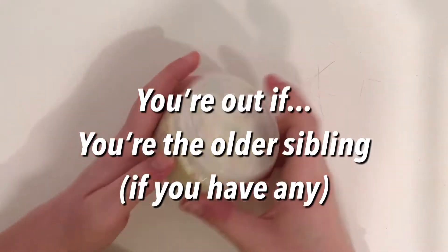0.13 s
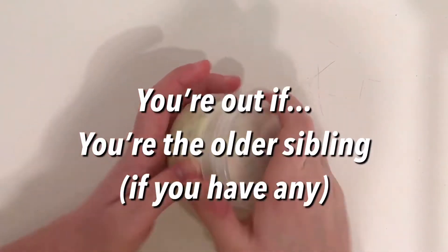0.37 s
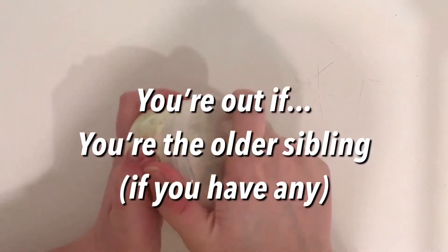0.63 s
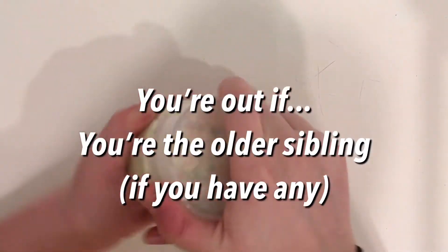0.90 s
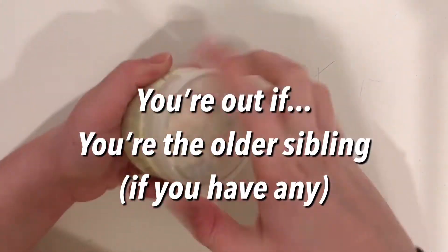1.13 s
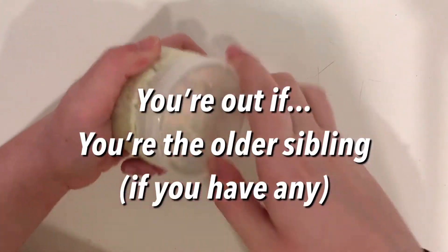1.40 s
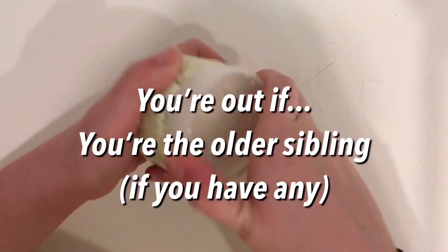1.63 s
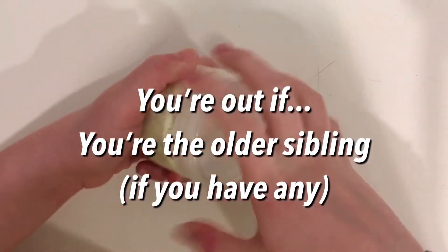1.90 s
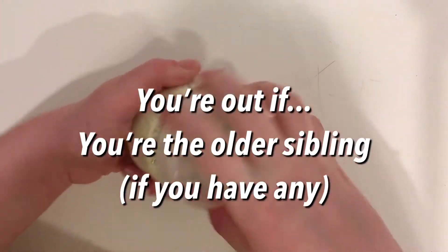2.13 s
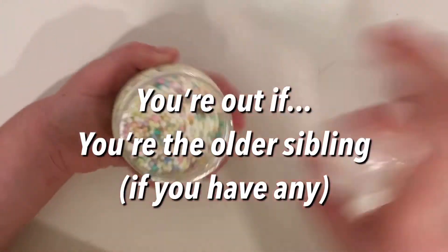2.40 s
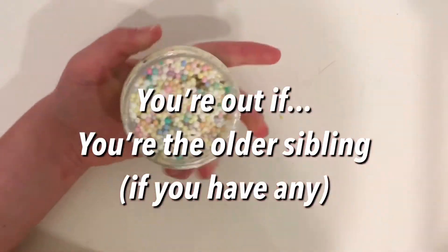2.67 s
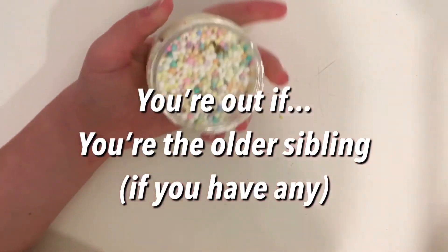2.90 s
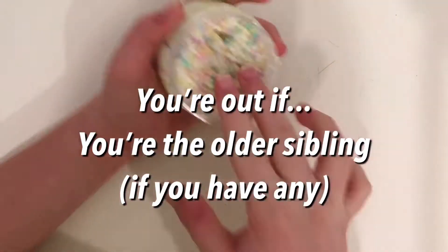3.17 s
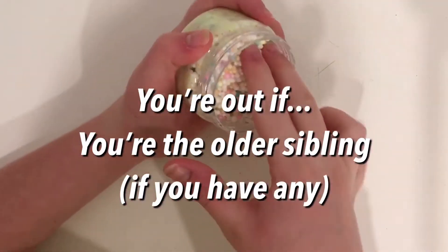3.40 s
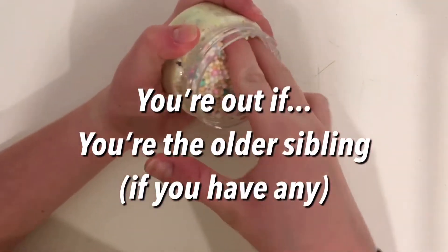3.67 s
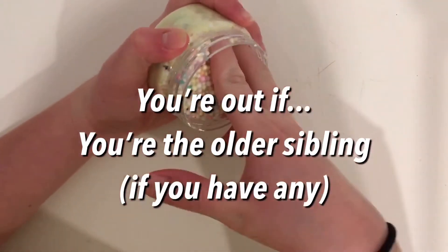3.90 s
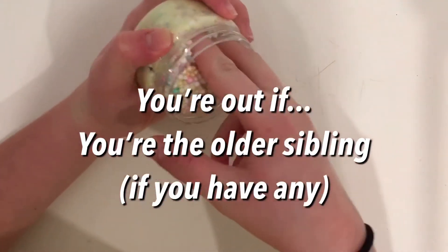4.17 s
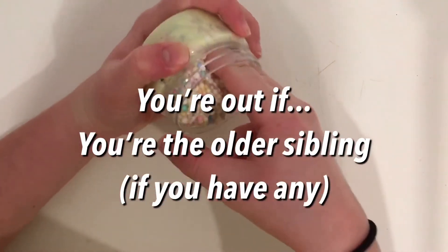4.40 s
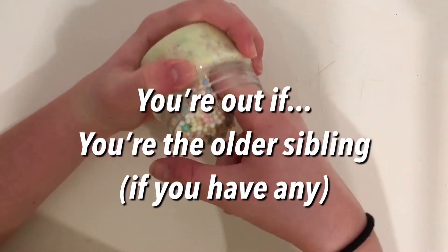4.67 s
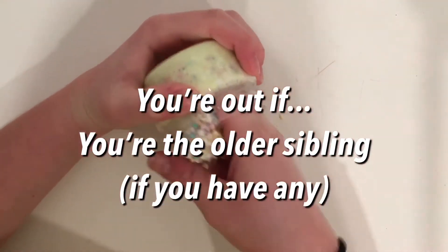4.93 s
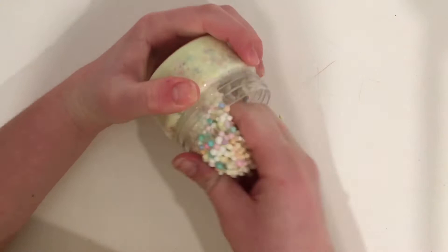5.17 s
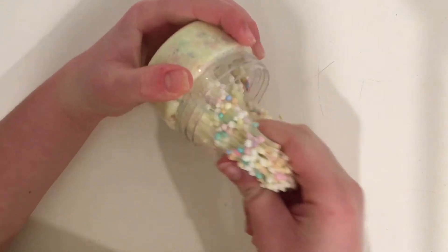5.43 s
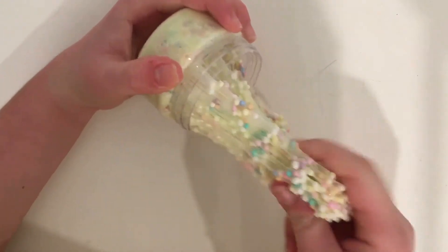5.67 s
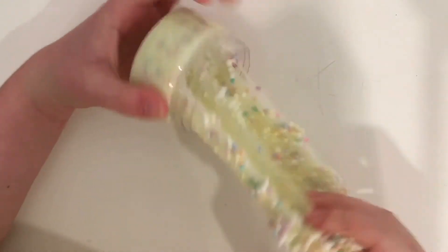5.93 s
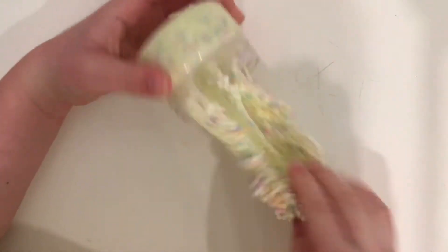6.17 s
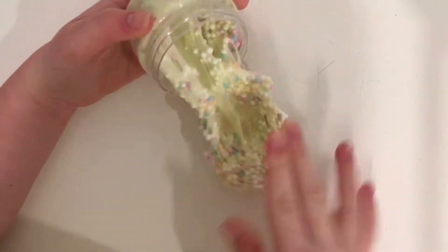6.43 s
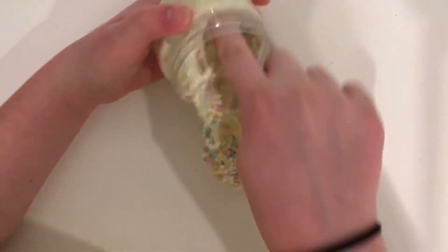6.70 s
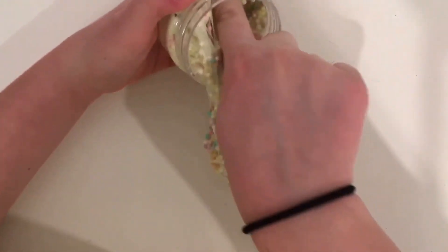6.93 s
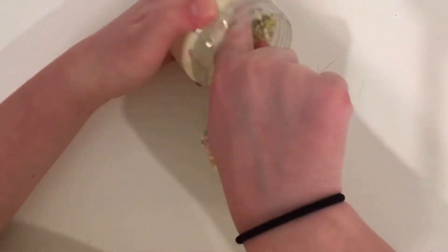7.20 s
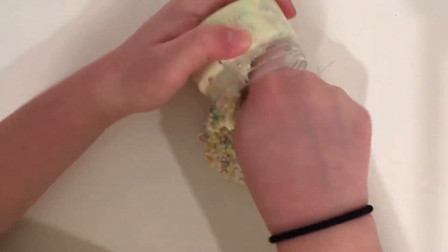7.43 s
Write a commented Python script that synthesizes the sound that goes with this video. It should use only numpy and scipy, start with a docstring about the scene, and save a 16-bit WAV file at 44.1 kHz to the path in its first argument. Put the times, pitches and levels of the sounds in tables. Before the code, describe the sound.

A close microphone in a quiet room with soft low rumble and faint hiss. From 0 to 2.5 seconds hands grip and twist a small plastic jar: gentle skin rustle, a very faint dry creak around 0.4 to 0.6, a brushing slip at 0.65, then hollow rubs and knocks near 1.2, 1.6 and 1.9, and a sharp loud click at 2.07. At 2.6 the lid hits a hard table with a bright plastic clack, bounces at 2.73 and wobbles in quickening rattles until about 3.1, the table top ringing briefly. Fingers enter bead-filled slime from 3.0: crisp crackle and sharp pops, a soft bump near 4.0, then dense snapping and wet squelching from 4.2 to 5.6, with a strong pop at 5.56. Stretching thins to sparse ticks and smoother rustle after 5.9, nearly quiet around 6.4, with snaps at 6.65 and renewed crackle and squelch from 7.15 to the end.

```python
"""Hands grip a small plastic jar and unscrew its lid: skin noise, hollow knocks and a creak of stick-slip clicks.
The lid drops on a hard table and wobbles to rest: rough contacts set its modes and the table top ringing.
Fingers then dig bead-filled slime out of the jar and stretch it: grains of noise crackle and squelch,
short bursts are popping air pockets, and arms and jar move the table top.
Filtered noise makes a quiet room throughout; the microphone is close."""
import sys
import numpy as np
from scipy import signal
from scipy.fft import rfft, irfft, next_fast_len
from scipy.io import wavfile

SR = 44100
rng = np.random.default_rng(int(sys.argv[2]) if len(sys.argv) > 2 else 0)


def inscribe(sig):
    """Save sig as 16-bit PCM at rate SR to the path in sys.argv[1].

    A 1-D sig is mono; a 2-D sig holds one channel per row.
    Samples are clipped to [-1, 1] before scaling.
    """
    pcm = np.round(np.clip(np.atleast_2d(sig).T, -1, 1) * 32767)
    wavfile.write(sys.argv[1], SR, pcm.astype(np.int16))


def magnitude_from_level(level_db):
    """Linear magnitude for a level in decibels (20 dB per decade)."""
    exponent = np.asarray(level_db, float) / 20
    return 10 ** exponent


N = 333837

# fingers in the slime: t/s, rustle level/dB, wet squelch level/dB, share of crackle in the rustle (0-1)
HANDS = [(3.0, -70, -59, .9), (3.09, -61, -64, 1), (3.3, -49.5, -78, 0.93), (3.52, -55, -85, 0.6),
         (3.7, -57, -75, 0.74), (3.78, -69.5, -77, 0.63), (3.9, -61.5, -74.5, 0.85), (3.96, -52, -68, 0.86),
         (4.1, -59, -66, 1), (4.28, -53, -63.5, 0.65), (4.45, -56.5, -68, 0.65), (4.63, -61.5, -68, 1),
         (4.8, -62, -68, .9), (4.87, -51.5, -62.5, 0.83), (5.2, -53, -64.5, 0.97), (5.42, -55, -61, 0.85),
         (5.7, -58, -75, 0.3), (5.82, -54, -82, 0.45), (5.98, -71.5, -87, 1), (6.08, -53.5, -81, 0.52),
         (6.2, -65, -81, 0.76), (6.28, -68, -76.5, 0.54), (6.5, -63.5, -76.5, 0.16), (6.85, -69.5, -75, 1),
         (7.1, -65.5, -76.5, .9), (7.18, -51, -64, 0.57), (7.3, -61, -67.5, 0.83), (7.57, -52, -58, 1)]
# pitch of the air space in the jar as fingers fill and leave it: t/s, f/Hz
AIR_SPACE = [(3.0, 1300), (4.8, 1290), (4.87, 673), (5.05, 920), (5.25, 1260), (5.6, 1400), (6.5, 1300),
             (7.57, 1250)]
TABLE_HZ, TABLE_T60_S = 96, 0.28   # lowest mode of the table top


def rms_one(x):
    """Scale to rms 1."""
    return x / np.sqrt(np.mean(x ** 2) + 1e-20)


def peak_one(x):
    """Scale every row to peak 1."""
    return x / np.abs(x).max(axis=-1, keepdims=True)


def in_time(rows):
    """Columns of a curve, one value a sample."""
    s, *columns = np.transpose(rows)
    return [np.interp(np.arange(N) / SR, s, column) for column in columns]


def during(rows):
    """True while a curve lasts."""
    t = np.arange(N) / SR
    return (t > rows[0][0]) & (t < rows[-1][0])


def band(x, low_hz, high_hz):
    """Butterworth band-pass: keeps the sound between two pitches."""
    edges = [low_hz, min(high_hz, SR / 2.2)]
    return signal.sosfilt(signal.butter(2, edges, "band", fs=SR, output="sos"), x)


def coloured(x, spectrum):
    """Shape by a spectrum in dB per Hz, then scale to rms 1."""
    hz, db = np.transpose(spectrum)
    size = next_fast_len(len(x))
    grid = np.maximum(np.arange(size // 2 + 1) * SR / size, 1)
    gain = magnitude_from_level(np.interp(np.log(grid), np.log(hz), db))
    return rms_one(irfft(rfft(x, size) * gain, size)[:len(x)])


def resonance(x, hz, width_hz):
    """Two-pole band with gain 1 on top."""
    r = np.exp(-np.pi * width_hz / SR)
    feedback = [1, -2 * r * np.cos(2 * np.pi * hz / SR), r * r]
    return signal.lfilter(np.array([1, 0, -1]) * (1 - r * r) / 2, feedback, x)


def ring(clicks, hz, t60):
    """A unit click sets a sine of starting height 1 ringing; it falls 60 dB in t60 seconds."""
    r, w = magnitude_from_level(-60 / (t60 * SR)), 2 * np.pi * hz / SR
    return signal.lfilter([0, np.sin(w)], [1, -2 * r * np.cos(w), r * r], clicks + 1e-18)


def drift(rate):
    """Slow random wandering of rms 1; a higher rate wanders faster."""
    r = np.exp(-2 * np.pi * rate / SR)
    noise = rng.standard_normal(N + SR)
    return rms_one(signal.lfilter([1], [1, -2 * r, r * r], noise)[SR:])   # first second: settling


def grains(per_s, spread_db):
    """Random clicks of very uneven size."""
    sizes = magnitude_from_level(spread_db * np.minimum(rng.exponential(1, N), 5)) * rng.choice([-1, 1], N)
    return sizes * (rng.random(N) < per_s / SR)


def bursts(count, rise_ms, t60_ms, size=2048):
    """Rows of noise that swell and die."""
    ms = np.arange(size) / SR * 1000
    rise_ms = np.maximum(rise_ms, .05)
    rise = np.minimum(ms / rise_ms, 1) ** 2
    fall = magnitude_from_level(-60 * np.maximum(ms - rise_ms, 0) / np.maximum(t60_ms, 1))
    return rng.standard_normal((count, size)) * rise * fall


def mixed(parts, gains):
    """Sum of bands, with a peak height set by their gains alone."""
    total = sum(gain * peak_one(part) for part, gain in zip(parts, gains))
    return peak_one(total) * np.sqrt(sum(gain ** 2 for gain in gains))


def add(out, s, sounds):
    """Lay each row into out at its time."""
    for at, sound in zip(np.round(np.asarray(s) * SR).astype(int), sounds):
        out[at:at + len(sound)] += sound[:N - at]


def swells(start_s, stop_s, db, rise_db_per_s, fall_db_per_s):
    """Level in dB of overlapping swells that rise, hold and fade."""
    t = np.arange(0, N + 64, 64) / SR   # one value every 64 samples, joined by lines
    before, after = np.maximum(start_s - t, 0), np.maximum(t - stop_s, 0)
    each = db - rise_db_per_s * before - fall_db_per_s * after
    total_db = 10 * np.log10(np.sum(magnitude_from_level(2 * each), axis=0) + 1e-14)   # powers add up
    return np.interp(np.arange(N) / SR, t, total_db)


def echoes(x, t60, cut_hz):
    """Dense reflections as fading noise; above cut_hz the noise is weaker and fades more slowly."""
    t = np.arange(SR // 2) / SR
    noise = rng.standard_normal(len(t)) * np.minimum(t / 0.0013, 1)
    dull = signal.sosfilt(signal.butter(1, cut_hz, fs=SR, output="sos"), noise)
    tail = dull * magnitude_from_level(-60 * t / t60) + 0.35 * (noise - dull) * magnitude_from_level(-60 * t / (1.4 * t60))
    return signal.fftconvolve(x, tail / np.sqrt(np.sum(tail ** 2)))[:N]


def room_tone():
    """Steady rumble and hiss, with a wavering low hum: noise through narrow resonances."""
    # sound of the quiet room: f/Hz, level per Hz/dB
    room_spectrum = [(15, -30.5), (25, -3.5), (80, 0.5), (123, 1), (241, -13), (425, -14), (500, -23),
                     (691, -22.5), (881, -26), (1250, -25.5), (4950, -37), (6140, -30), (10300, -34),
                     (13100, -29.5), (15800, -28.5)]
    hum_hz, hum_width_hz = 46, 14
    hum = resonance(rng.standard_normal(N), hum_hz, hum_width_hz)
    hum = rms_one(resonance(hum, hum_hz, 2 * hum_width_hz))
    return magnitude_from_level(-59.5) * coloured(rng.standard_normal(N), room_spectrum) + magnitude_from_level(-65) * hum


def rustle(db, crackle):
    """Smooth hiss, and fine clicks in clumps; each click has a colour of its own."""
    # colour of skin and slime noise: f/Hz, level per Hz/dB
    rustle_spectrum = [(350, -32), (600, 1), (1040, -14.5), (2630, -3.5), (5000, -1), (6230, -4.5),
                       (7760, -7), (10300, 0), (12200, 2), (14400, 1), (15800, -4.5)]
    clicks = grains(1200 * magnitude_from_level(6 * drift(30)), spread_db=5.0)
    edges_hz = [700, 2500, 5000, 8000, 11000, 18000]
    dealt = rng.integers(0, 5, N)   # each click sounds in its own band and the neighbouring ones
    fine = sum(band(clicks * (abs(dealt - k) <= 1), edges_hz[k], edges_hz[k + 1]) for k in range(5))
    hiss = coloured(rng.standard_normal(N), rustle_spectrum) * magnitude_from_level(3.3 * drift(20))
    hiss_share = np.sqrt(1 - np.clip(crackle, 0, 1) ** 2)
    return magnitude_from_level(db) * (crackle * coloured(fine, rustle_spectrum) + hiss_share * hiss)


def jar(x):
    """The plastic jar and the air inside it colour whatever rubs or knocks it."""
    # resonances of the jar: f/Hz, width/Hz, level/dB
    jar_modes = [(290, 130, -8), (550, 190, 2), (780, 220, -7), (1150, 110, 0)]
    # neighbouring resonances have opposite signs
    return sum(magnitude_from_level(db) * (-1) ** k * resonance(x, hz, width) for k, (hz, width, db) in enumerate(jar_modes))


def hollow_rub(db):
    """Fingers slide on the jar wall in uneven jerks: flickering noise and clicks through the jar."""
    rubbing = rng.standard_normal(N) * magnitude_from_level(3 * drift(40))
    rubbing = rubbing + .6 * rms_one(grains(500, spread_db=4))
    return magnitude_from_level(db) * rms_one(band(jar(rubbing), 300, 1500))


def rumble(db):
    """Handling shakes jar and table top: uneven low noise."""
    return magnitude_from_level(db) * rms_one(band(rng.standard_normal(N) * magnitude_from_level(2.5 * drift(30)), 120, 380))


def grips():
    """Each grip swells and fades: skin rustles, the jar sounds hollow, the hands rumble."""
    # grips and turns of the closed jar: loudest t/s, skin rustle level/dB, hollow level/dB, swell/s, fade/s
    grip_rows = [(.06, -64, -84, 0.23, 0.17), (.33, -62, -74, 0.23, 0.4), (.48, -64.5, -69.5, 0.86, 0.51),
                 (0.656, -46.5, -80, 0.13, 0.16), (0.831, -51, -64.5, 0.35, 0.24),
                 (0.906, -59, -47.5, 0.11, 0.064), (1.163, -48, -41.5, 0.012, 0.034),
                 (1.2, -61.5, -62, 0.14, 0.18), (1.638, -46.5, -48.5, 0.2, 0.17),
                 (1.699, -68, -48.5, 0.25, 0.029), (1.891, -79, -50.5, 0.011, 0.25),
                 (1.962, -44.5, -42, 0.088, 0.2), (2.068, -37, -45, 0.013, 0.09),
                 (2.2, -64, -67.5, 0.6, 0.21), (2.41, -66.5, -78, 0.14, 0.15)]
    s, rustle_db, hollow_db, swell_s, fade_s = np.transpose(grip_rows)[:, :, None]
    swing_db = 30   # swell and fade are the times to rise and fall this much
    rise, fall = swing_db / np.maximum(swell_s, .005), swing_db / np.maximum(fade_s, .005)
    rustle_db = swells(s, s, rustle_db, rise, fall)
    hollow_db = swells(s, s, hollow_db, rise, fall)
    rumble_db = np.maximum(hollow_db - 1, -71.5)   # never quieter than the still hands
    before_slime = np.arange(N) / SR < HANDS[0][0]
    return rustle(rustle_db, crackle=0.45) + hollow_rub(hollow_db) + rumble(rumble_db) * before_slime


def touches():
    """Skin slips briefly on the plastic and knocks the hollow jar: noise bursts in three bands."""
    # slips and knocks of lid and fingers:
    # t/s, treble peak/dB, middle above treble/dB, knock above treble/dB, t60/ms
    touch_rows = [(0.645, -27.5, -9, -24, 60), (0.6993, -34.5, -20, -11, 3.1), (0.216, -68, 6, 9.5, 13),
                  (0.259, -62, 0.5, 6, 9), (0.752, -39.5, -18, -8, 14), (1.131, -43, -21, -8, 4.6),
                  (1.1617, -30.5, -3, -4.5, 16.3), (1.284, -43.5, -11, -12, 3.3), (1.293, -50, -3, -34, 5),
                  (1.425, -45.5, -5, -17, 6), (1.6177, -31, -10, -18, 7.1), (1.642, -26.5, -24, 0.5, 13.8),
                  (1.7078, -26.5, -10.5, -20, 7.1), (1.8797, -36, -15, 3, 8), (1.907, -53.5, -6, 16, 7.8),
                  (1.9549, -23, -30, -4.5, 16), (1.972, -28.5, -17, -25, 45), (2.0609, -46, -8, 10, 9),
                  (2.0709, -10.5, -14, -14, 7.5), (2.081, -24, -11, -35, 24), (2.581, -55.5, 5, -2, 8.5)]
    s, db, middle_db, knock_db, t60_ms = np.transpose(touch_rows)[:, :, None]
    burst = bursts(len(s), 0.079 * t60_ms, t60_ms)   # longer bursts rise more slowly
    knock = jar(burst) + .4 * band(burst, 130, 900)
    parts = band(burst, 6000, 17000), band(burst, 2000, 6000), knock
    out = np.zeros(N)
    add(out, s[:, 0], magnitude_from_level(db) * mixed(parts, [1, magnitude_from_level(middle_db), magnitude_from_level(knock_db)]))
    return out


def creak():
    """Nearly regular stick-slip steps of the turning thread ring the plastic."""
    # thread creaks while the lid turns: start t/s, length/s, slips per second/Hz, relative level/dB
    creak_rows = [(0.384, .01, 105, -40), (0.417, .06, 122, -40), (0.503, .04, 123, -37.5),
                  (0.582, .045, 160, -38)]
    # what the slips ring: f/Hz, width/Hz, level/dB
    thread_modes = [(1200, 120, 17), (2140, 240, 5.5), (4300, 520, 7), (6060, 830, 4)]
    start, length, per_s, db = np.transpose(creak_rows)[:, :, None]
    middle = start + length / 2
    rate = np.interp(np.arange(N) / SR, middle[:, 0], per_s[:, 0])
    cycles = np.cumsum(rate * magnitude_from_level(0.45 * drift(20))) / SR
    slips = np.diff(np.floor(cycles), prepend=0)   # one click each time a cycle is full
    level_db = swells(start, start + length, db, rise_db_per_s=600, fall_db_per_s=900)
    slips = slips * magnitude_from_level(level_db + 3.9 * drift(15) + rng.normal(0, 3.0, N))
    ringing = sum(magnitude_from_level(mode_db) * resonance(slips, hz, width) for hz, width, mode_db in thread_modes)
    return 1.5 * band(slips, 10000, 17000) + ringing


def rolling_rim():
    """The rim rolls on the table: dense small contacts."""
    # rolling of the lid's rim: t/s, relative level/dB
    wobble = [(2.72, -45), (2.772, -50), (2.832, -45.5), (2.918, -49), (3.054, -47), (3.16, -66)]
    return magnitude_from_level(in_time(wobble)[0] - 24) * during(wobble) * rms_one(grains(2500, spread_db=3.0))


def lid_ring(bounces, size=1024):
    """Each contact is a short rough push into all modes of the lid; the rolling rim drives them too."""
    # modes of the lid: f/Hz, relative level/dB, t60/s before the cap below
    lid_modes = [(960, -11, 0.037), (1067.6, -20, 0.21), (1222, -13, 0.089), (1270, -12, .015),
                 (1697, -4, 0.017), (2000, -15.5, .03), (2318, -6, 0.016), (2400, -2, .01),
                 (2800, 3, 0.0075), (3040, -5.5, 0.0063), (3530, 2.5, .01), (4000, 0, 0.012),
                 (5980, -4.5, 0.0083), (6290, 1, 0.013), (7050, -24, 0.0027), (8900, -2, 0.0042),
                 (12280, 2.5, 0.00091)]
    s, db, contact_ms, bright_db, favoured_hz, low_db = bounces
    t = np.arange(size) / SR
    rolling = rolling_rim()
    out = np.zeros(N)
    for hz, mode_db, t60 in lid_modes:
        # the push is slightly shorter for high modes
        rise = t / (np.maximum(contact_ms, .2) / 1000) * (hz / 2500) ** 0.11
        push = rng.standard_normal((len(s), size)) * rise * np.exp(-2 * rise)
        nearby = np.exp(-2j * np.pi * t[:, None] * (hz + np.linspace(-1, 1, 5) / t60))
        push /= np.sqrt(np.mean(np.abs(push @ nearby) ** 2, axis=1, keepdims=True))   # unit drive at this mode
        strength_db = db - 9 + mode_db + bright_db * np.log2(hz / 2500) + low_db * (hz < 1500)
        # each spot of the rim drives other modes
        strength_db += 7 * np.exp(-(np.log2(hz / favoured_hz) / 0.2) ** 2)
        pushes = rolling * magnitude_from_level(mode_db)
        add(pushes, s[:, 0], magnitude_from_level(strength_db + rng.normal(0, 0.65, db.shape)) * push)
        longest_s = 30 / hz + .1 * (hz < 2300)
        out += ring(pushes, hz, min(t60, longest_s))
    return band(out, 800, 18000)   # a small lid radiates no bass


def lid_crack(bounces):
    """Each bounce gives a broad crack and a bright top: two bands of noise bursts."""
    s, db, contact_ms, bright_db, _, _ = bounces
    crack = np.zeros(N)
    middle = peak_one(band(bursts(len(s), contact_ms / 2, t60_ms=8), 1200, 5400))
    add(crack, s[:, 0], magnitude_from_level(db - 10) * middle)
    top = peak_one(band(bursts(len(s), contact_ms / 3, t60_ms=4.0), 7000, 14000))
    add(crack, s[:, 0], magnitude_from_level(db - 14 + 1.8 * bright_db) * top)
    return crack


def table_knock(bounces):
    """Each bounce thumps the table top, whose low modes ring on."""
    # higher modes of the table top: f/Hz, level above the lowest mode/dB, t60/s
    table_modes = [(200, 3.5, 0.027), (394.7, -0.5, 0.071)]
    s, bounce_db = bounces[:2]
    thumps = np.zeros(N)
    add(thumps, s[:, 0], magnitude_from_level(bounce_db - 30.5) * np.hanning(60) / 30)
    knock = sum(magnitude_from_level(db) * ring(thumps, hz, t60) for hz, db, t60 in table_modes)
    return knock + ring(thumps, TABLE_HZ, TABLE_T60_S)


def table_tail(x):
    """The table top rings densely after each contact."""
    return echoes(x, t60=0.33, cut_hz=3300)


def lid():
    """The dropped lid bounces and rolls: ringing lid, cracks, and the table top under it."""
    # lid on table:
    # t/s, strength/dB, contact length/ms, brightness per octave/dB, favoured modes f/Hz, low ring/dB
    bounce_rows = [(2.6027, -6.5, 1.36, -0.5, 2450, 7.5), (2.7308, -5, 1.27, 4, 2280, -11),
                   (2.813, -17.5, 5.1, -2, 3240, -3.5), (2.884, -15.5, 3.7, 0.5, 1540, -2),
                   (2.943, -20.5, 3.6, -3.5, 1590, -7), (2.958, -28, 1.7, -7, 2620, -17),
                   (2.992, -28, 4.95, -2, 3180, 2), (3.0072, -23, 0.65, 2, 2800, -6),
                   (3.034, -25, 4.7, -4, 2000, -4), (3.0449, -25, 1.5, -1, 3130, -6)]
    bounces = np.transpose(bounce_rows)[:, :, None]
    ringing, crack = lid_ring(bounces), lid_crack(bounces)
    ringing = ringing + magnitude_from_level(-14.5) * table_tail(ringing)
    crack = crack + magnitude_from_level(-7) * table_tail(crack)
    return ringing + crack + table_knock(bounces)


def table_boom():
    """The table top hums at its lowest mode when arms lean on it: noise through a narrow resonance."""
    # arms lean on the table top: start t/s, length/s, level/dB
    leans = [(2.6, .06, -52), (2.736, 0.096, -49), (3.165, 0.058, -52), (4.006, 0.026, -50),
             (4.233, .2, -54.5), (4.5, 0.16, -55.5), (4.9, 0.24, -68), (5.885, 0.062, -58),
             (6.098, .25, -58.5), (6.58, .1, -63.5), (7.16, 0.36, -64.5)]
    start, length, db = np.transpose(leans)[:, :, None]
    lean_db = swells(start, start + length, db, rise_db_per_s=250, fall_db_per_s=157)
    boom = resonance(rng.standard_normal(N), TABLE_HZ, width_hz=25)
    return magnitude_from_level(lean_db) * rms_one(resonance(boom, TABLE_HZ, width_hz=50))


def squelch(db, width, size=256):
    """Wet slime sliding in the open jar: clumps of dull grains, coloured by the air space as its pitch moves."""
    wet = rms_one(grains(350 * magnitude_from_level(6.7 * drift(19)), spread_db=5.0)) + 1.12 * rng.standard_normal(N)
    out, state = np.zeros(N), np.zeros(2)
    for i, hz in zip(range(0, N, size), in_time(AIR_SPACE)[0][::size]):
        r = np.exp(-np.pi * width * hz / SR)   # width is a share of the pitch
        feedback = [1, -2 * r * np.cos(2 * np.pi * hz / SR), r * r]
        out[i:i + size], state = signal.lfilter([1, 0, -1], feedback, wet[i:i + size], zi=state)
    return magnitude_from_level(db) * rms_one(rms_one(out) + .5 * rms_one(band(wet, 360, 2800)))


def fizz():
    """Tiny bright snaps between the beads: random clicks with only their treble kept."""
    return rms_one(band(grains(500 * magnitude_from_level(5 * drift(25)), spread_db=5.0), 10000, 17000))


def small_pops(crackle_db):
    """Many smaller pockets, as rows like the loud pops, at random moments; they follow the crackle."""
    count, first_s = 60, HANDS[0][0]
    when, size, dull, hollow, long = rng.random((count, 5)).T
    s = first_s + when * (N / SR - first_s - .01)
    db = crackle_db[(s * SR).astype(int)] + 17 + 8 * (size - .5)
    lower_db = -9.5 + 16 * (dull - .5)
    hollow_db = lower_db - 21.5 + 8 * (hollow - .5)
    return np.transpose([s, db, lower_db, hollow_db, 6.9 * (.5 + long)])


def snaps(pops, ring_cycles, size=1024):
    """A film tears: a sharp noise burst; the air space in the jar rings a few cycles."""
    s, db, lower_db, hollow_db, t60_ms = np.transpose(pops)[:, :, None]
    t = np.arange(size) / SR
    burst = bursts(len(s), 0.2, t60_ms, size=size)
    burst = burst + magnitude_from_level(8) * bursts(len(s), 0.32, t60_ms=0.4, size=size)   # sharp spike at the first instant
    # the upper middle lies between top and lower middle
    upper_db = 2 + 0.43 * lower_db + rng.normal(0, 2.5, db.shape)
    hz = np.interp(s, *np.transpose(AIR_SPACE)) * magnitude_from_level(rng.normal(0, .6, db.shape))
    hollow = np.sin(2 * np.pi * hz * t) * np.minimum(t * hz, 1) * magnitude_from_level(-60 * t * hz / ring_cycles)
    hollow = peak_one(hollow) + .6 * peak_one(band(burst, 500, 2000))
    parts = band(burst, 9000, 17000), band(burst, 4500, 9000), band(burst, 2000, 4500), hollow
    out = np.zeros(N)
    add(out, s[:, 0], magnitude_from_level(db) * mixed(parts, [1, magnitude_from_level(upper_db), magnitude_from_level(lower_db), magnitude_from_level(hollow_db)]))
    return out


def slime():
    """Crackle, squelch, rumble and bursting air pockets."""
    # the louder air pockets bursting:
    # t/s, top peak/dB, lower middle above top/dB, hollow ring above top/dB, t60/ms
    loud_pops = [(3.0638, -23, -19, -15, 5.6), (3.086, -20, -39, -31, 4.4), (3.1142, -22.5, -47, -39, 4),
                 (3.1576, -28, -31, -35, 4.5), (3.2097, -18, -42, -47, 3), (3.2291, -28.5, -8.5, -35, 3.6),
                 (3.3185, -13, -23, -42, 6.4), (3.3333, -25, -32, -41, 4), (3.3682, -24.5, -30, -25, 3.6),
                 (3.4007, -27.5, -10.5, -22, 5.4), (3.4318, -28, 3.5, -17, 1.7),
                 (3.4681, -33.5, -0.5, -32, 4), (3.4754, -23, -17, -37, 4), (3.489, -14.5, -26.5, -56, 2.9),
                 (3.538, -35, -22, -39, 4), (3.5797, -23.5, -27, -41, 4.7), (3.614, -19, -33, -47, 6.3),
                 (3.6405, -21.5, 1.5, -14, 5), (3.6538, -28, -29, -35, 2.8), (3.739, -28, -27, -43, 5.9),
                 (3.8262, -38.5, -22, -30.5, 5.3), (3.9835, -39, 4, -4, 3.5), (4.0296, -51, 15, -22, 4),
                 (4.1023, -40, 4, -7, 2.4), (4.1368, -31.5, -26, -18, 3.1), (4.146, -46, -23, -20, 3.2),
                 (4.1562, -27, -23, -26, 2.9), (4.1684, -38, -33, -5.5, 5.7),
                 (4.1938, -25.5, -29, -26, 4.7), (4.2305, -38, -8, -32, 4), (4.2481, -21.5, -26, -38, 4),
                 (4.2526, -18, -42, -35, 8.7), (4.2625, -18.5, -18, -40, 4), (4.2936, -26, -21, -27, 4),
                 (4.3168, -32, -5, -14.5, 3), (4.4366, -31, -24, -36, 3.6), (4.5384, -32, -22, -38, 5),
                 (4.559, -26.5, -41, -39, 5), (4.592, -35.5, -30.5, -34, 4.5),
                 (4.6294, -30.5, -36, -33, 5.2), (4.6658, -29, -21, -32, 4.8), (4.7493, -34, -30, -34, 4),
                 (4.762, -51.5, 10, -2, 2.8), (4.7918, -46.5, 10.5, -9, 3.5),
                 (4.8583, -23, -12.5, -42, 2.3), (4.8685, -32, -1, -22, 9.6),
                 (4.8993, -25.5, -20, -22, 5.3), (4.9222, -30, -9.5, -26, 4.6), (4.9426, -29.5, -5, -31, 4),
                 (4.978, -24.5, -32, -48, 8.1), (5.021, -17, -29, -29, 12), (5.0313, -36, 8, -6.5, 6.1),
                 (5.0467, -23, -37, -35, 6.2), (5.084, -19.5, -26, -39, 4), (5.1341, -16, -36, -23.5, 5.1),
                 (5.1865, -26, -18, -31, 4.7), (5.2056, -25.5, -12, -34, 6.6), (5.228, -30, -21, -28, 4),
                 (5.251, -24.5, -5.5, -21.5, 2.5), (5.2849, -22, -23, -30, 5.7),
                 (5.3652, -26, -22, -29, 4.4), (5.378, -35, 1, -9, 3.3), (5.3882, -28, -24, -13, 3.3),
                 (5.4406, -25, -33, -27, 4), (5.5143, -31, -8, -16, 5.2), (5.5592, -10, -32, -40, 10),
                 (5.5752, -28, -7.5, -24, 5.3), (5.6804, -24, -14, -33, 3.7), (5.7673, -43, 0, -13, 4.7),
                 (5.8198, -18, -19.5, -35, 3), (5.8396, -32, -17, -33, 4), (5.8881, -48, 4, -17, 4),
                 (5.9066, -35, -1.5, -24, 4), (5.954, -31, -27, -29, 4.4), (6.0202, -44, -18, -30, 3.7),
                 (6.0427, -47, 2, -25, 4), (6.0813, -35, -22, -32, 4.5), (6.131, -41, -25, -36, 4),
                 (6.1712, -35.5, -18, -28, 5.2), (6.1875, -30, -23, -26, 5.6), (6.21, -41, -9, -30, 4.8),
                 (6.575, -48, -21, -6, 4.3), (6.6558, -20.5, -36, -34, 2.1), (6.6708, -28.5, -16, -28, 4),
                 (6.6767, -40, -4, -10.5, 1.8), (6.6884, -36, -23, -29, 4), (6.7014, -54, 5.5, -8, 4),
                 (6.7248, -55, -4, -4, 4), (6.7466, -52, -16, 0, 4), (6.8404, -31, -22.5, -28, 4.5),
                 (6.9253, -31.5, -15.5, -22.5, 4), (6.985, -50, -14.5, -27, 4),
                 (7.0123, -30, -45, -35, 3.5), (7.0854, -43, -15, -23, 3.7), (7.0938, -32, -19, -32, 4),
                 (7.1242, -34, -24, -32, 4.5), (7.1597, -27.5, -23, -23, 4),
                 (7.1733, -21, -11.5, -35, 11.5), (7.191, -21, -36, -46, 4), (7.2002, -33, -17, -32, 4),
                 (7.3297, -39, -4.5, -27, 4.7), (7.4295, -34.5, -8, -40, 12), (7.4342, -47, -3, -15, 3.5),
                 (7.4912, -33.5, -8, -32, 9)]
    rustle_db, squelch_db, crackle = in_time(HANDS)
    crackle = np.clip(crackle, .05, 1)
    # handling rumble in the open jar takes part in the rustle's swing
    rumble_db = -77 + .3 * (rustle_db - rustle_db.mean()) + 4 * drift(9.1)
    steady = rustle(rustle_db, crackle) + squelch(squelch_db, width=0.44) + rumble(rumble_db)
    steady = steady + magnitude_from_level(rustle_db - 7) * crackle * fizz()
    pops = np.vstack([loud_pops, small_pops(rustle_db + 20 * np.log10(crackle))])
    return during(HANDS) * steady + snaps(pops, ring_cycles=11.4)


def bump():
    """The jar bumps the table once: a soft push sets jar and table top swinging."""
    push = np.zeros(N)
    add(push, [3.984], [magnitude_from_level(-32) * np.hanning(100) / 50])   # time in s, strength in dB
    return ring(push, hz=154, t60=0.063) + 0.34 * ring(push, TABLE_HZ, TABLE_T60_S)


def scene():
    """All near sounds, their echoes, the leaning arms and the room tone."""
    near = grips() + touches() + creak() + lid() + slime() + bump()
    near = near + magnitude_from_level(-14) * echoes(near, t60=0.2, cut_hz=17000)
    return (near + table_boom() + room_tone())[None]


def band_limit(x):
    """A steep low-pass at the top of the band."""
    return signal.sosfilt(signal.butter(12, 17150, fs=SR, output="sos"), x)


def record(dry):
    """Peaks are rounded; the microphone has a few dips in the treble and a steep top cut."""
    # microphone colour: f/Hz, width/Hz, level/dB
    dips = [(4890, 450, -7.5), (7510, 400, -6.5), (10360, 490, -13)]
    overload = .85   # no peak passes this height here
    mix = overload * np.tanh(dry / overload)
    for hz, width, db in dips:
        mix = mix - (1 - magnitude_from_level(db)) * resonance(mix, hz, width)
    top_cut = signal.ellip(8, .3, 40, 15850, fs=SR, output="sos")   # ripple dB, stop dB, cut Hz
    mix = signal.sosfiltfilt(top_cut, mix)
    return band_limit(mix)


dry = scene()
out = record(dry)
inscribe(out)
```